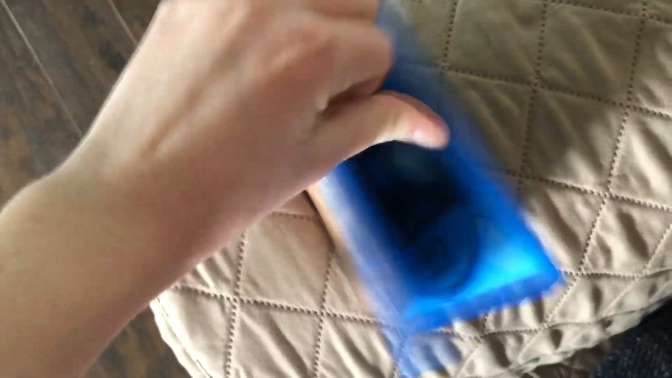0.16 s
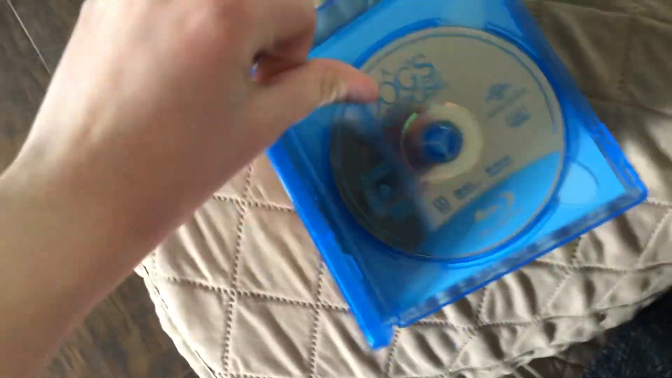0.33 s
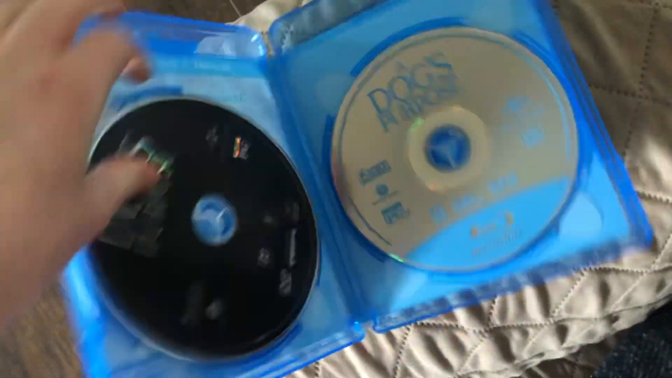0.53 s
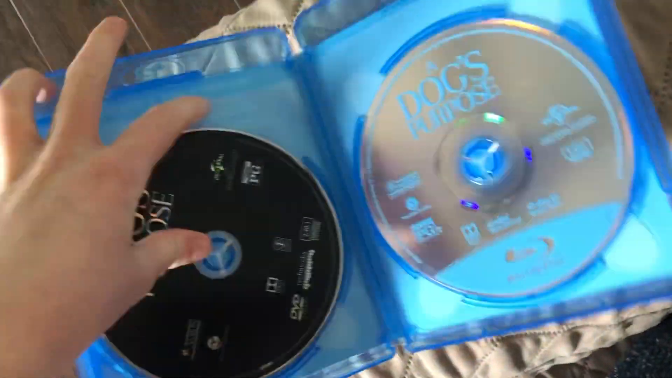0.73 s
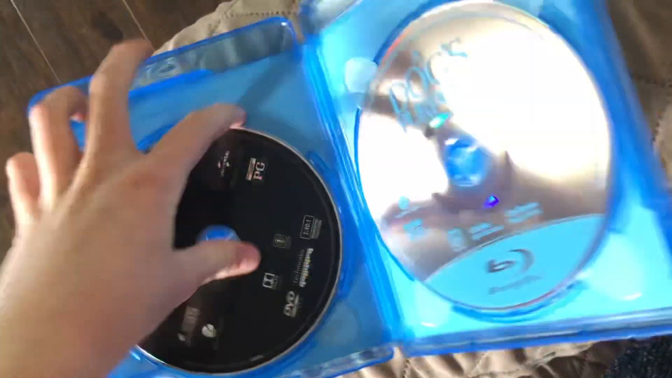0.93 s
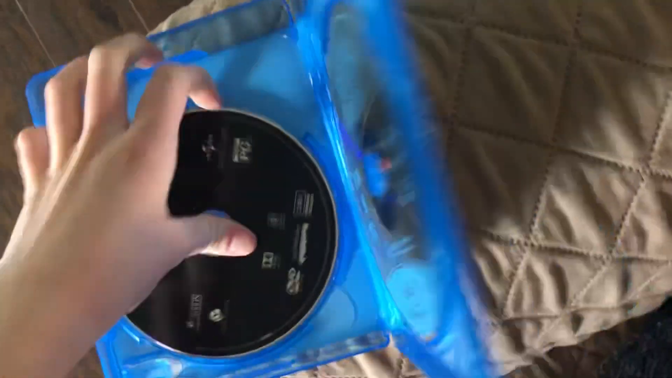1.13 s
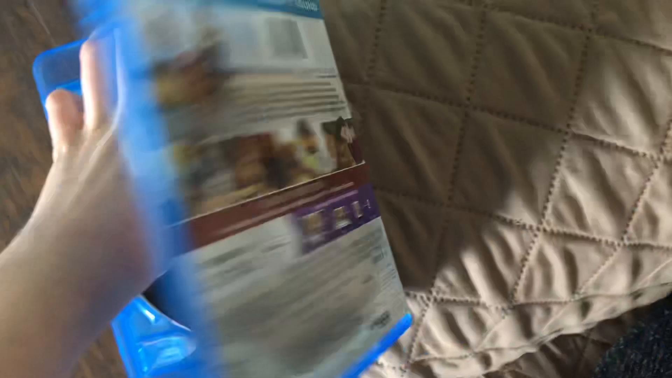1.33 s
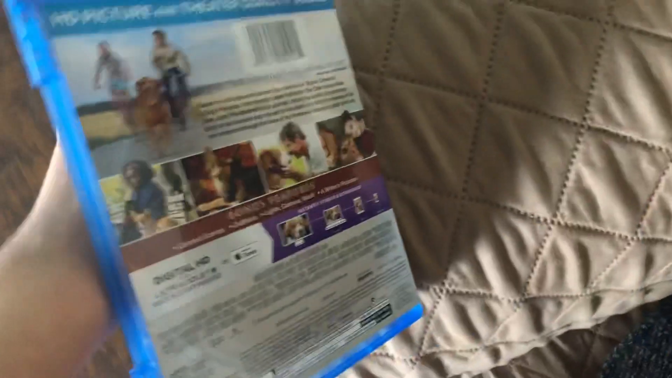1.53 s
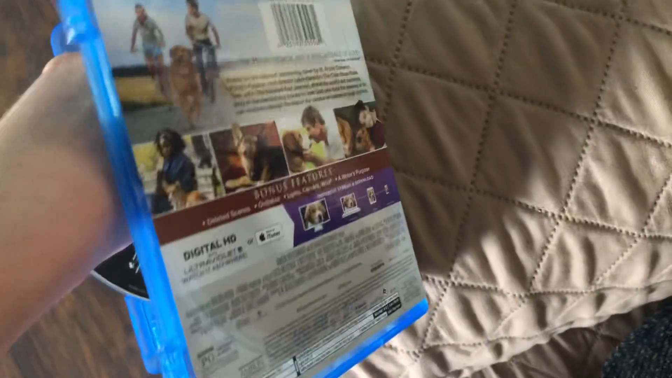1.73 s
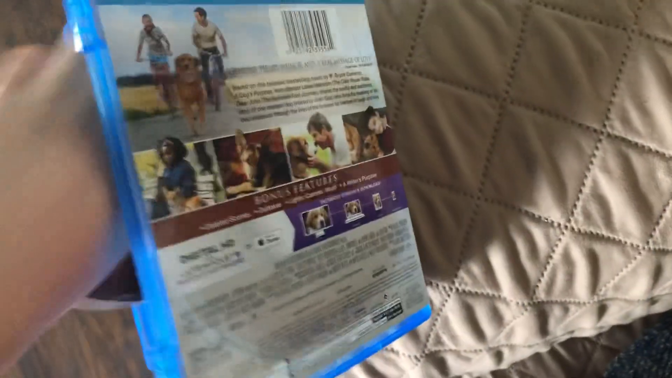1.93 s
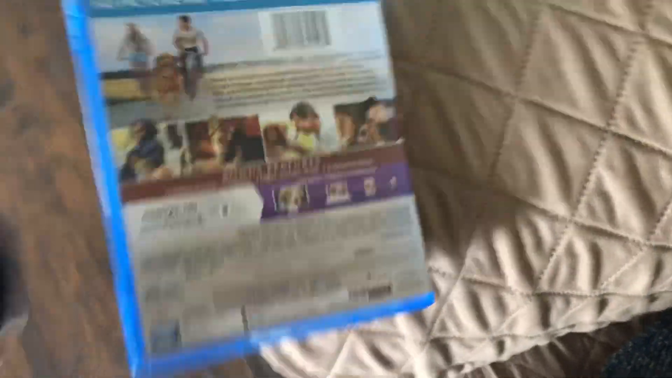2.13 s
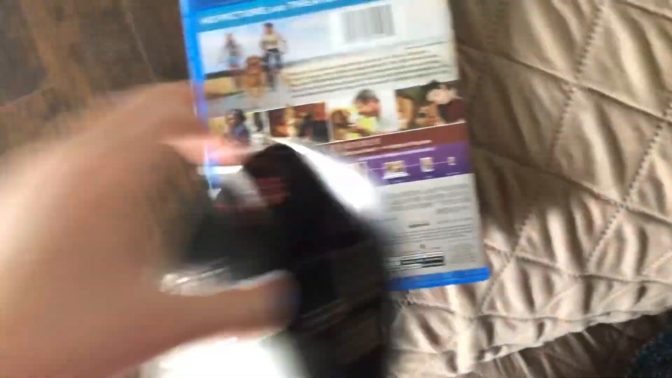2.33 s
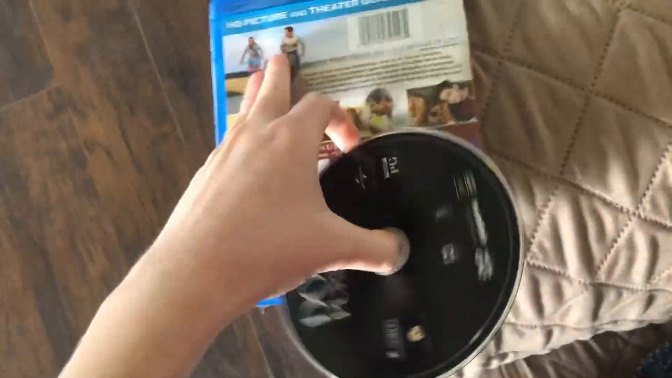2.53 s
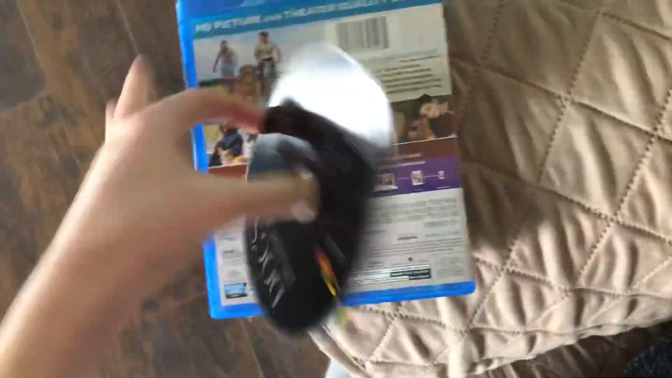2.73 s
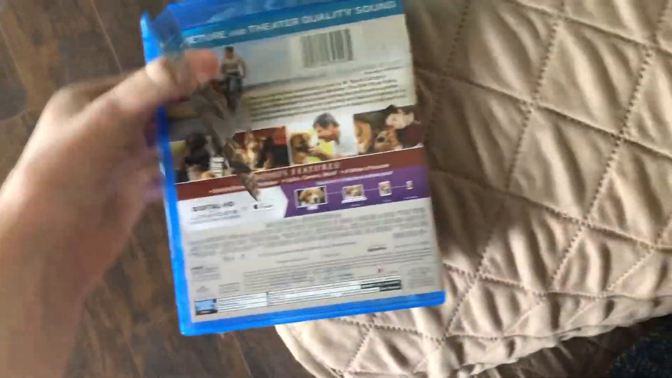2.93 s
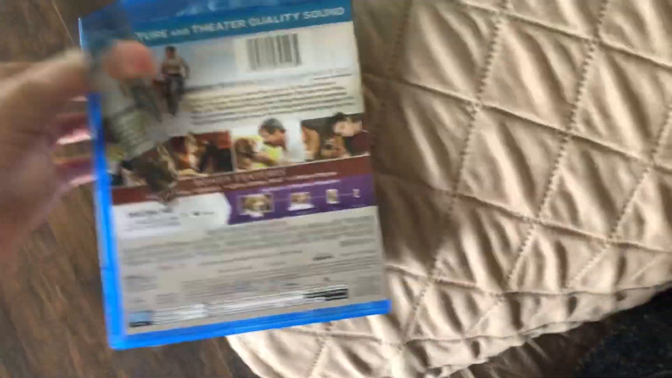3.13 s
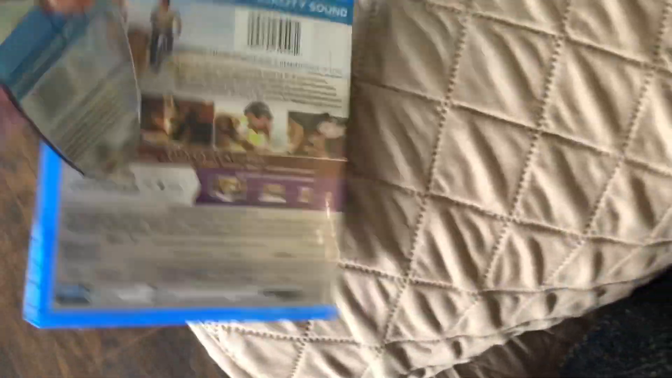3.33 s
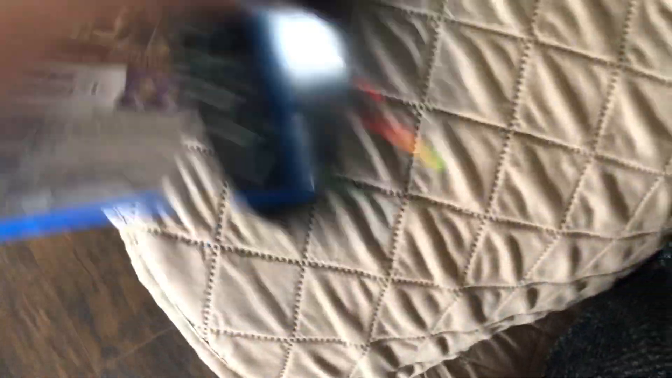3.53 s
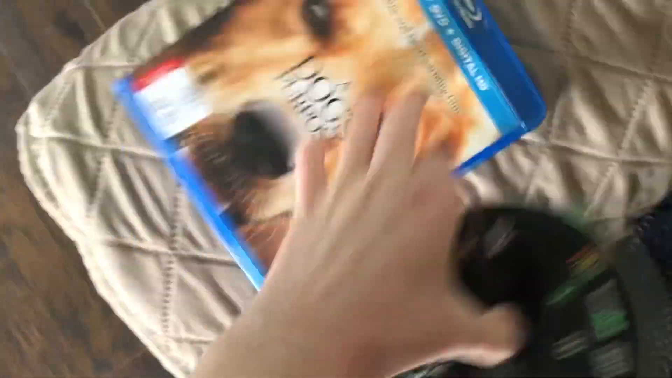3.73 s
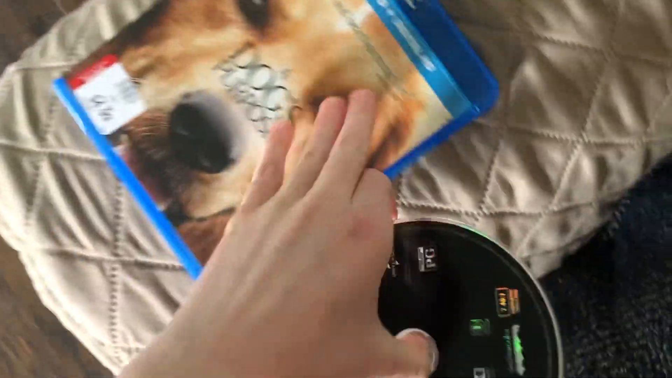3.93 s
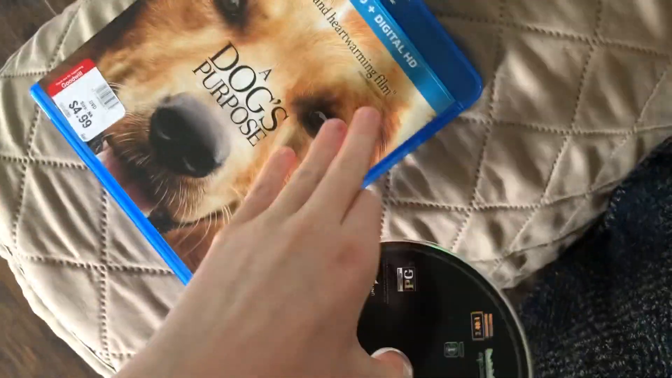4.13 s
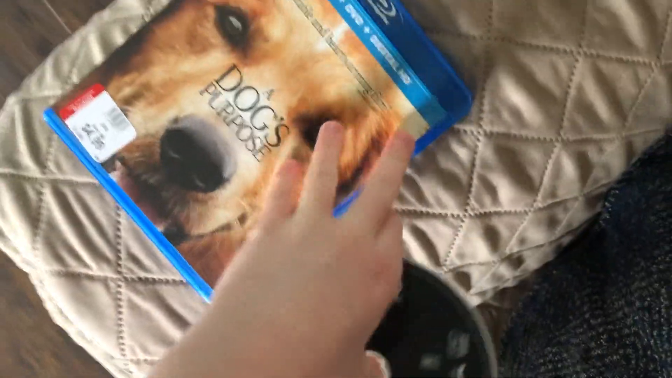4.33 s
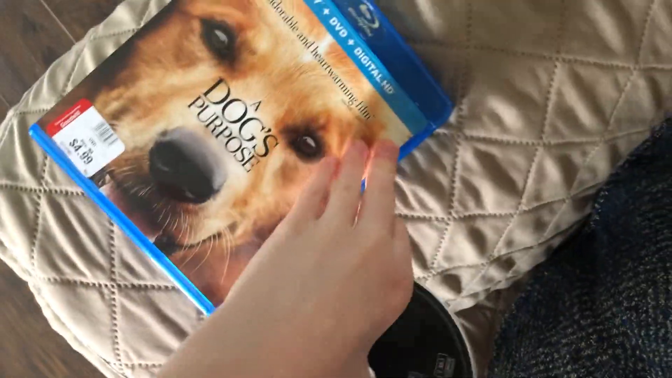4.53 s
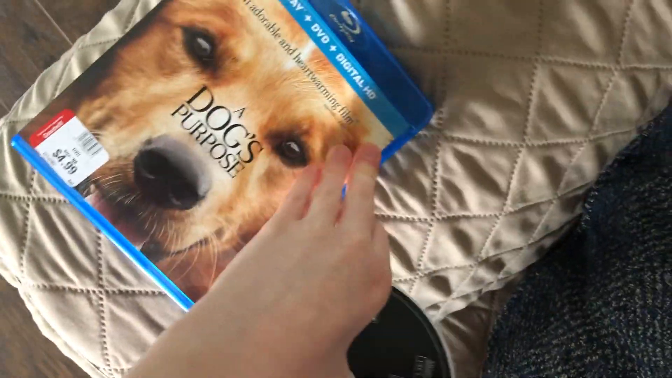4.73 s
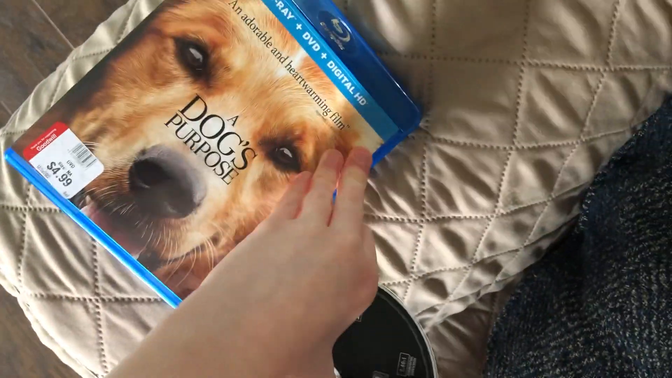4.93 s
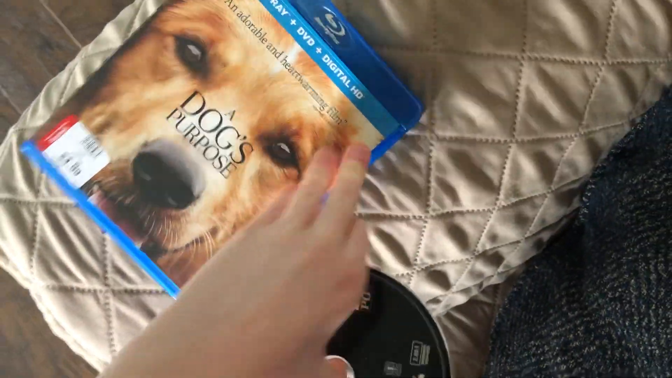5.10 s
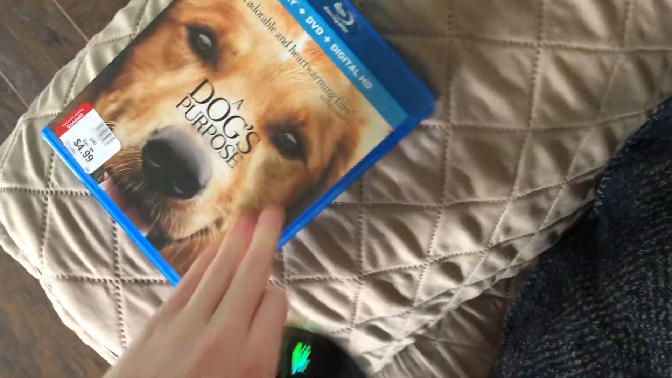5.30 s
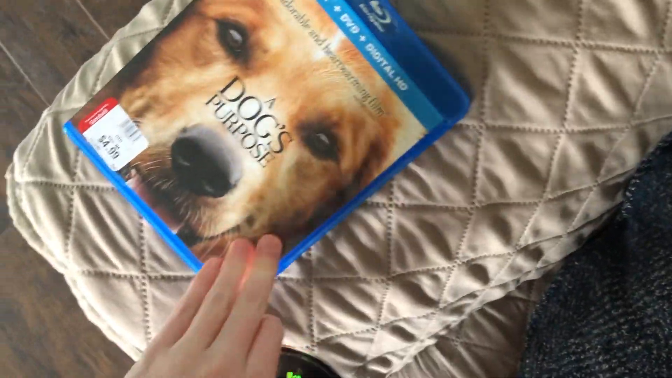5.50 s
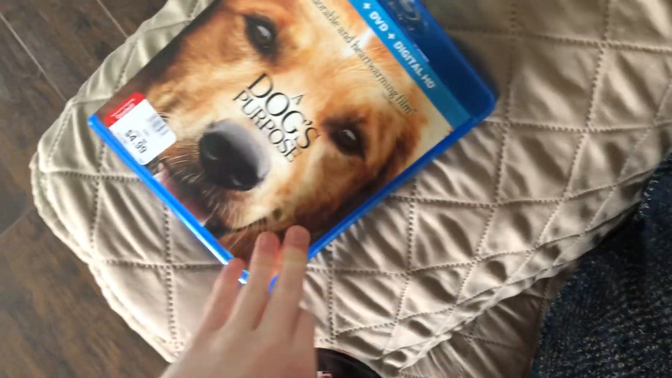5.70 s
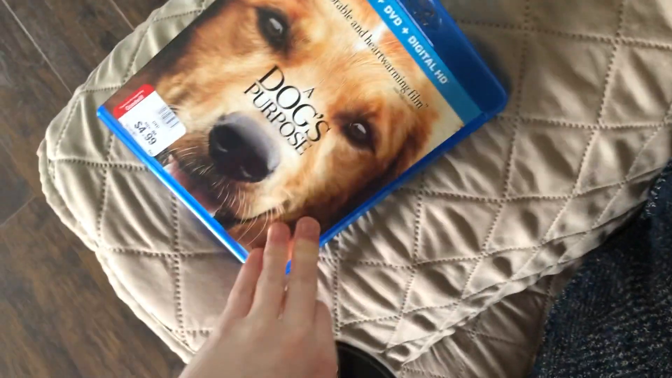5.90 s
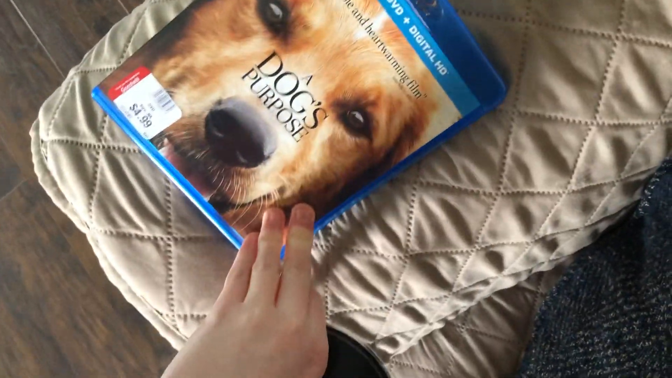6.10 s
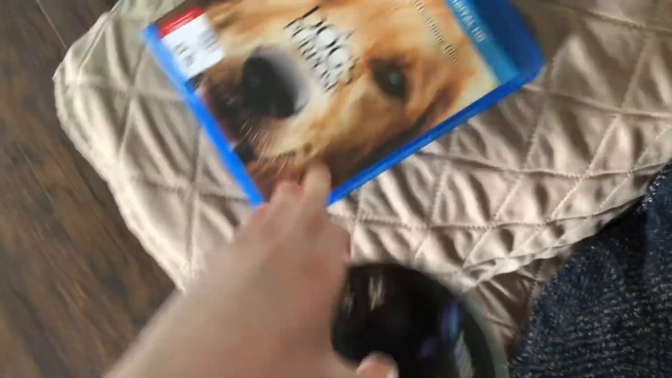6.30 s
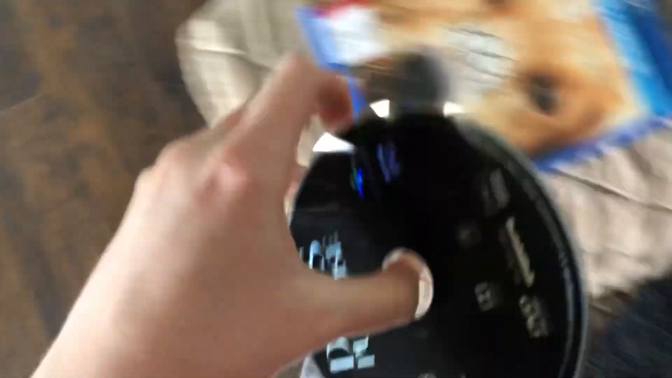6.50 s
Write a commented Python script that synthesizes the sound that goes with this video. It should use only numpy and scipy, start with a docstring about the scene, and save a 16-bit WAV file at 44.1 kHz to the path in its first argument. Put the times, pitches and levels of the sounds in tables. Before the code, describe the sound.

A plastic disc case snaps open, a disc clicks off its hub, and the case clatters onto a quilt and clicks shut.

```python
"""A hand snaps open a plastic disc case on a quilt, pries a disc off its hub, then flips the case and
presses it shut; a few faint touches trail off. Each contact is a short clatter that rings the thin lid,
its stiff rim and the latch, at times with a soft thud as the case sinks into the quilt. In between, skin
and disc rub on plastic. All along, a furnished room answers over a low hum and microphone hiss."""
import sys
import numpy as np
from scipy import signal
from scipy.fft import rfft, irfft
from scipy.io import wavfile
from scipy.ndimage import uniform_filter1d

SR = 44100
rng = np.random.default_rng(int(sys.argv[2]) if len(sys.argv) > 2 else 0)


def pcm_store(signal):
    """Save signal as 16-bit PCM."""
    levels = np.round(np.clip(np.atleast_2d(signal), -1, 1) * 32767)
    wavfile.write(sys.argv[1], SR, levels.astype(np.int16).T)


N = 289015

# Clicks and snaps of the case. Each row: start in seconds, lid peak in dB, favoured lid pitch in Hz,
# latch peak in dB, favoured latch pitch in Hz, decay time of the clatter in ms.
CONTACTS = [(0.1298, -56, 1570, -49.5, 5100, 3.4), (0.1392, -51.5, 1450, -49.5, 6000, 8.3),
            (0.1526, -9, 2200, -7, 9800, 1.8), (.1569, -13.5, 900, -9.5, 6400, 2.7),
            (0.1636, -8, 1900, -3, 6400, 1.8), (.174, -15, 1350, -23.5, 6600, 9),
            (0.1846, -19.5, 1400, -6, 8600, .7), (0.1941, -23.5, 1300, -31, 5900, 6.2),
            (0.3295, -36.5, 2280, -41, 11000, 0.5), (.355, -65, 1500, -44, 13000, 2.5),
            (.371, -68, 1510, -48, 10000, 1.5), (0.4009, -63, 1005, -41.5, 10000, 0.36),
            (.44, -48, 1900, -36.5, 6900, 0.2), (0.5314, -33.5, 1840, -37.5, 7800, 5),
            (.536, -33, 960, -31, 5000, 1.55), (0.625, -44.5, 2310, -52, 5000, 1.1),
            (0.7232, -49, 810, -46.5, 5600, 2.1), (0.8633, -38, 700, -46, 6700, 2.4),
            (.8792, -42, 530, -40.5, 5200, 0.93), (0.8932, -42, 680, -55, 5000, .5),
            (.904, -52, 1500, -56, 5000, .7), (0.9317, -46, 650, -71, 5900, 1.2),
            (.9659, -50, 1495, -53.5, 5000, 1.9), (0.9713, -29, 1126, -27, 5000, 5.7),
            (1.0113, -36.5, 1070, -37.5, 5900, 3.4), (1.0911, -43, 730, -67, 6600, 1.9),
            (1.216, -55.5, 954, -65, 5000, 1.2), (1.3006, -27.5, 580, -35.5, 5000, 3.7),
            (1.435, -26.5, 552, -44.5, 5800, 3.4), (1.4415, -15.5, 2600, -11, 5300, 1.5),
            (1.4442, -11.5, 1500, -12, 5200, 1.4), (1.4472, -35, 1160, -24, 6300, .9),
            (1.4624, -30.5, 1380, -24, 5100, 1.1), (1.5704, -27.5, 2350, -34.5, 5900, .7),
            (1.576, -31.5, 920, -37, 5200, 4.4), (1.6206, -34, 1830, -40, 5000, 2.5),
            (1.6288, -37, 666, -41, 5000, 3.1), (1.6922, -42.5, 1100, -54, 5000, 1.2),
            (1.699, -54, 547, -43.5, 8900, 2), (1.811, -44.5, 670, -44, 5000, 3.3),
            (1.924, -49.5, 1080, -44.5, 10600, 1.4), (2.0152, -43.5, 1140, -27.5, 8700, 3.9),
            (2.0248, -41, 1160, -22, 10000, 3.7), (2.1558, -60, 1360, -40, 9900, 0.74),
            (2.2192, -36, 1040, -39, 9500, 6.3), (2.2251, -32.5, 1110, -33.5, 7600, 1.85),
            (2.294, -55, 1080, -49, 8500, 1.9), (2.305, -50, 940, -47.5, 9300, 2.3),
            (2.3186, -39, 1054, -57, 12000, 2.1), (2.3694, -44.5, 1063, -62, 11200, 1.5),
            (2.4879, -57, 730, -37.5, 6100, 0.58), (2.4929, -52, 2010, -39, 6200, 1.5),
            (2.5024, -36, 1180, -43, 6000, 2), (2.5162, -47, 950, -40.5, 5300, 1.6),
            (2.5312, -34.5, 745, -43, 6900, 1.65), (2.541, -44, 990, -48, 5700, 2.2),
            (2.5844, -61, 557, -43, 11200, 0.86), (2.7663, -50, 977, -66, 6500, 1.65),
            (2.974, -43, 1200, -48, 5000, 1.2), (3.0277, -53, 2297, -48, 5000, .8),
            (3.7096, -44.5, 558, -43, 9700, 2), (3.7296, -42.5, 1250, -52, 5600, 1.7),
            (3.7527, -31, 1150, -40, 5000, 3.7), (3.7576, -25.5, 1180, -26, 5000, 3),
            (3.769, -18, 895, -20.5, 5000, 4.5), (3.779, -24.5, 1140, -25, 5600, 4.3),
            (3.7826, -31, 1060, -23, 6000, 1.1), (3.7854, -21.5, 1060, -8, 6300, .45),
            (3.7877, -14, 970, -19.5, 7400, 2.4), (3.7953, -26.5, 1900, -38.5, 5600, 2.4),
            (3.8019, -23.5, 1210, -29.5, 5200, 2.1), (3.818, -27.5, 1130, -48, 5600, 0.65),
            (4.034, -72.5, 1005, -46.5, 7070, 0.53), (4.044, -42.5, 1147, -63, 11900, 1.35),
            (4.1108, -45.5, 1940, -54, 5200, 2), (4.154, -51, 900, -68, 5700, 1.8),
            (4.381, -60, 798, -51, 13900, 5.7), (4.6072, -22.5, 1560, -23, 5100, 2.1),
            (4.947, -65.5, 560, -55, 5000, .7), (5.0779, -50, 820, -74, 5000, 2.9),
            (5.0917, -51.5, 1910, -70, 5000, 2.4), (5.1307, -35.5, 900, -51, 7200, 1.76),
            (5.1654, -47, 776, -53, 6200, 1.9), (5.5022, -45.5, 1160, -61, 5100, 1.14),
            (5.514, -53, 1510, -64, 5100, 1.2), (5.5492, -57, 1200, -77, 6000, 1.5),
            (5.5839, -51, 1080, -68, 5000, 1.76), (5.601, -54, 692, -59, 6600, 2.2),
            (5.6288, -55, 580, -56, 5100, 1), (6.223, -52.5, 760, -64, 5900, 1.24),
            (6.323, -58, 610, -45.5, 6600, 1.7), (6.4469, -49, 970, -39.5, 5700, 1.9),
            (6.4544, -40, 1190, -49.5, 6500, 4.2), (6.5105, -53, 1150, -60, 5000, 1.3)]
# Resonances: the lid gives body, the rim bite, the latch snap, the case on the quilt weight.
# Each row: pitch in Hz, bandwidth in Hz, relative level in dB.
LID_MODES = [(446.4, 500, -8), (745, 350, -22), (920, 510, -5), (1296, 290, -4), (1726, 390, -2),
             (1831.5, 440, 1), (2320, 800, -12)]
RIM_MODES = [(2840, 800, 2), (3126, 530, -7), (3330, 5100, 1), (4960, 2100, -1)]
LATCH_MODES = [(5260, 900, 3.5), (6200, 900, 3.5), (7700, 1400, -1), (9197, 280, 1.33), (9970, 2700, -2),
               (11800, 1700, 1), (14000, 2000, 1.5), (15200, 1800, 0)]
QUILT_MODES = [(75, 60, -15), (125, 70, -2), (190, 110, -3), (300, 160, 2)]
# Soft bumps into the quilt. Each row: start in seconds, peak in dB, favoured pitch in Hz.
THUDS = [(.154, -24.5, 236), (0.169, -30, 100), (.532, -42.5, 200), (.726, -47, 110), (.82, -50.5, 172),
         (.865, -47, 200), (.973, -44.5, 240), (1.013, -49, 162), (1.303, -41.5, 238), (1.438, -38, 301),
         (1.449, -28, 100), (1.579, -44, 220), (1.628, -45, 170), (1.811, -48, 250), (2.03, -48.5, 192),
         (2.226, -47, 170), (2.505, -50.5, 189.5), (2.53, -45, 141.3), (3.711, -47, 200), (3.757, -39, 230),
         (3.772, -26.5, 230), (3.787, -26.5, 155), (3.818, -41, 100), (4.609, -36.5, 150),
         (5.131, -45.5, 250)]
# Fingers and disc sliding on plastic. Each row: start in seconds, length in seconds,
# scuff level in dB, hiss level in dB, centre of the hiss in Hz.
RUBS = [(0.278, .16, -55, -67, 11000), (0.481, 0.19, -58, -81, 5620), (0.645, 0.1, -65, -61.5, 7100),
        (0.713, 0.14, -63.5, -74.5, 5900), (0.802, 0.024, -43, -71, 6960), (0.826, 0.017, -41, -75, 6000),
        (0.839, 0.071, -51, -82, 5470), (1.011, 0.017, -64.5, -64, 6000), (1.149, 0.034, -52, -69, 4890),
        (1.312, 0.046, -60.5, -76.5, 6040), (1.541, 0.22, -53.5, -62.5, 8950),
        (1.793, 0.034, -55, -63, 8960), (1.755, 0.21, -65.5, -67, 9610), (1.901, 0.17, -63, -62, 9520),
        (2.009, .034, -47.5, -43, 9230), (2.035, 0.016, -63, -50, 9600), (2.22, .09, -70.5, -84, 9000),
        (2.484, .07, -51.5, -81.5, 6980), (2.577, 0.073, -87, -66.5, 11200), (2.919, .21, -75, -87, 6020),
        (3.311, .029, -67.5, -81.5, 5000), (3.64, 0.089, -65, -74.5, 6000),
        (3.711, 0.063, -57.5, -81, 6000), (3.935, .06, -71.5, -71, 8000), (4.149, 0.082, -71.5, -65, 13150),
        (5.059, 0.055, -66, -91, 5950), (5.11, .15, -76, -66, 8700), (5.229, .21, -73, -69.5, 9100),
        (5.62, .33, -75.5, -94.5, 6000), (6.14, 0.23, -74.5, -82, 9000), (6.437, .1, -79, -79, 6100)]
# Noise colours of the lid's scuff, the skin's hiss, the background air and the house hum.
# Each row: frequency in Hz, relative spectral level in dB.
SCUFF_SPECTRUM = [(300, -14), (700, -2), (1100, 0), (2000, -8), (3200, -7), (5000, -15.5), (9000, -27)]
SKIN_SPECTRUM = [(2500, -25.5), (4800, -4), (5900, 3.5), (7200, -1.5), (9600, 1.5), (11500, -1.5),
                 (13500, 1), (16000, 2.5)]
AIR_SPECTRUM = [(53, -43.5), (90, -16.5), (152, 0.5), (286, -3), (340, -3.5), (371, -2.5), (1060, -17.5),
                (1860, -19), (2320, -24.5), (3080, -24.5), (10200, -31), (15100, -35.5), (16500, -51)]
HUM_SPECTRUM = [(20, -22.5), (40, -9), (60, -1), (72, -5.5), (100, -13), (130, -43)]
# Length of the room's tail. Each row: frequency in Hz, time to fall 60 dB in seconds.
ROOM_T60 = [(100, .45), (300, .42), (800, .46), (2000, 0.67), (5000, .5), (9000, .4), (14000, .3)]
# Colour of the reflections. Each row: frequency in Hz, relative level in dB.
ROOM_COLOUR = [(100, 0), (500, -3.5), (1500, -5), (4500, -7), (8000, -8.5), (11000, -10), (15000, -9.5)]


def contact(lid_db, lid_hz, latch_db, latch_hz, decay_ms):
    """A fast-dying clatter of tiny impacts, a few of them large, rings lid, rim and latch."""
    t = np.arange(4096) / SR
    size, chance = rng.standard_normal((2, len(t)))
    decay_s = decay_ms / 1000
    force = size * gain_of(5.3 * chance) * (1 - np.exp(-t / (0.14 * decay_s))) * np.exp(-t / decay_s)
    hardest = force * np.exp(-t / (3 * decay_s))  # the hardest impacts come first
    lid_spot, rim_spot, latch_spot = 2 * rng.standard_normal((3, 12))  # dB per mode, new on every hit
    focus = np.interp(lid_db, [-40, -20], [18, 7])  # a light tap rings one patch, a blow the whole lid
    lid = ring(force, LID_MODES, lid_spot, lid_hz, focus, band_hz=[350, 2800])
    rim = ring(force, RIM_MODES, rim_spot, 2870, focus=2.7, band_hz=[2200, 5600])
    latch = ring(hardest, LATCH_MODES, latch_spot, latch_hz, focus=12, band_hz=[4200, 17000])
    edge_db = 3.5 * np.log2(lid_hz / 1200)  # nearer the edge, the lid rings higher and the rim harder
    rim_db = 0.65 * lid_db + 0.35 * latch_db - 1.5 + edge_db  # the rim lies between lid and latch
    return gain_of(lid_db) * lid + gain_of(rim_db) * rim + gain_of(latch_db) * latch


def ring(force, modes, spot_db, favoured_hz, focus, band_hz):
    """A force rings damped modes, weaker by `focus` dB per octave away from the favoured pitch."""
    hz, width, db = np.transpose(modes)[:, :, None]
    t = np.arange(len(force)) / SR
    struck_db = spot_db[:len(hz), None] - focus * abs(np.log2(hz / favoured_hz))
    polarity = (-1) ** np.arange(len(hz))[:, None]  # opposite signs fill the valleys between modes
    strength = polarity * gain_of(db + struck_db) * width
    partials = strength * np.exp(-np.pi * width * t) * np.sin(2 * np.pi * hz * t)
    response = signal.sosfilt(signal.butter(2, band_hz, "band", fs=SR, output="sos"), partials.sum(0))
    direct = signal.fftconvolve(force, response)[:len(force)]
    # what spreads to the walls averages all directions, so only the modes colour it
    scattered = response * np.linalg.norm(direct) / np.linalg.norm(response)
    return np.array([direct, scattered]) / abs(direct).max()


def thud(peak_db, hz):
    """The case sinks into the soft quilt, then springs back."""
    sink = np.arange(4096) / SR / 0.0012  # time in units of 1.2 ms
    force = sink * (2 - sink) * np.exp(-sink)
    spot_db = 2 * rng.standard_normal(len(QUILT_MODES))
    return gain_of(peak_db) * ring(force, QUILT_MODES, spot_db, hz, focus=7.6, band_hz=[50, 420])


def rubbing():
    """Sliding makes a grainy scuff in the lid and a fine hiss at the skin; strokes swell and fade."""
    scuff = shaped_noise(SCUFF_SPECTRUM, patchy_db=2.5, flicker_db=2.5)
    hiss = shaped_noise(SKIN_SPECTRUM, patchy_db=1.5, flicker_db=1.5)
    swell_share, tint_db = 0.52, -11  # rising part of a stroke; hiss level an octave off centre
    out = np.zeros(N)
    for start_s, length_s, scuff_db, hiss_db, hiss_hz in RUBS:
        rise, fall = round(swell_share * length_s * SR), round((1 - swell_share) * length_s * SR)
        start = round(start_s * SR)
        n = min(rise + fall, N - start)
        part = slice(start, start + n)
        octaves = np.log2((np.fft.rfftfreq(n, 1 / SR) + 1) / hiss_hz)
        skin = unit_rms(irfft(rfft(hiss[part]) * gain_of(tint_db * octaves ** 2), n))
        stroke = np.sin(np.pi / 2 * np.interp(np.arange(n), [0, rise, rise + fall], [0, 1, 0]))
        out[part] += stroke * (gain_of(scuff_db) * scuff[part] + gain_of(hiss_db) * skin)
    return out


def room(send, first_s=0.0036, build_s=0.011, early_db=1.5, early_t60=0.17, wet_db=-17):
    """Sparse reflections build up after the nearest wall: a quick bloom, then a tail fading by band."""
    taps = np.zeros(SR)
    slots = np.arange(0, SR - 20, 12)
    arrivals = slots + rng.integers(0, 12, len(slots))
    taps[arrivals] = rng.choice([-1., 1.], len(arrivals))
    taps *= 1 - np.exp(-np.maximum(np.arange(SR) / SR - first_s, 0) / build_s)
    hz, t, bands = signal.stft(taps, SR, nperseg=256)
    early = gain_of(early_db - 60 * t / early_t60)
    late = gain_of(-60 * t / curve_at(ROOM_T60, hz)[:, None])
    colour = gain_of(curve_at(ROOM_COLOUR, hz)[:, None])
    tail = signal.istft(bands * colour * (early + late), SR, nperseg=256)[1]
    return gain_of(wet_db) * signal.fftconvolve(send, tail / np.linalg.norm(tail))[:N]


def background():
    """A bed of still air and microphone hiss over the low, wavering hum of the house."""
    air = gain_of(-67.5) * shaped_noise(AIR_SPECTRUM, patchy_db=0.1, flicker_db=1.0, size=1024)
    hum = gain_of(-69) * shaped_noise(HUM_SPECTRUM, patchy_db=1.5, flicker_db=1.5, size=4096)
    return air + hum


def shaped_noise(spectrum, patchy_db, flicker_db, size=512):
    """Coloured noise at rms 1, with drifting patches and a flicker shared by all bands."""
    frames, hz = 4 * N // size + 5, np.fft.rfftfreq(size, 1 / SR)
    real, imag, patches = rng.standard_normal((frames, len(hz), 3)).T
    patches = uniform_filter1d(patches, size=8, axis=0)  # smear across frequency
    patches = unit_rms(uniform_filter1d(patches, size=14, axis=1))  # and across time
    flicker = unit_rms(uniform_filter1d(rng.standard_normal(frames), size=3))
    level_db = curve_at(spectrum, hz)[:, None] + patchy_db * patches + flicker_db * flicker
    bands = (real + 1j * imag) * gain_of(level_db)
    return unit_rms(signal.istft(bands, nperseg=size, noverlap=3 * size // 4)[1][:N])


def gain_of(db):
    """Decibels to amplitude."""
    return 10 ** (np.asarray(db) / 20)


def unit_rms(x):
    """Scales to rms 1."""
    return x / np.sqrt(np.mean(x ** 2) + 1e-20)


def curve_at(points, hz):
    """Reads a table on a log-frequency axis."""
    point_hz, value = np.transpose(points)
    return np.interp(np.log(hz + 1), np.log(point_hz + 1), value)


def add(mix, start_s, sound):
    """Mixes a sound in at its start time."""
    part = mix[round(start_s * SR):][:len(sound)]
    part += sound[:len(part)]


def scene():
    """Case and hand up close, the room behind them and the background bed, in mono."""
    close = rubbing()
    room_send = close.copy()
    for source, cues in [(contact, CONTACTS), (thud, THUDS)]:
        for start_s, *settings in cues:
            direct, scattered = source(*settings)
            add(close, start_s, direct)
            add(room_send, start_s, scattered)
    return (close + room(room_send) + background())[None]


def record(dry, low_cut_hz=36, high_cut_hz=15900):
    """The microphone drops the deepest bass; a steep high cut trims the very top."""
    thinned = signal.sosfilt(signal.butter(4, low_cut_hz, "high", fs=SR, output="sos"), dry)
    high_cut = signal.firwin(401, high_cut_hz, window=("kaiser", 12), fs=SR)
    return signal.oaconvolve(thinned, high_cut[None], "same")


dry = scene()
out = record(dry)
pcm_store(out)
```